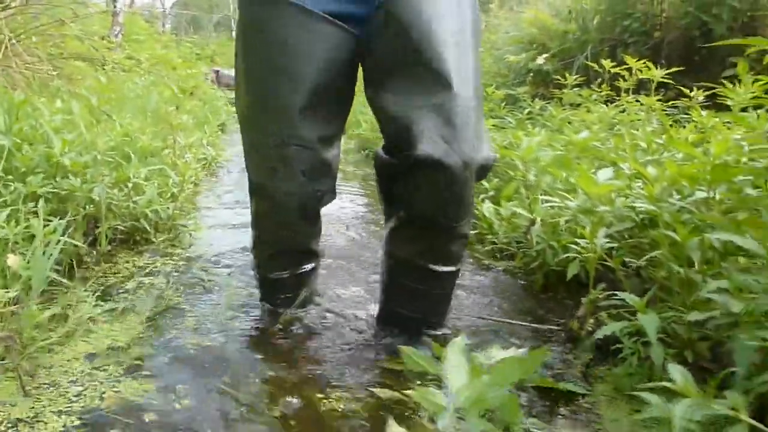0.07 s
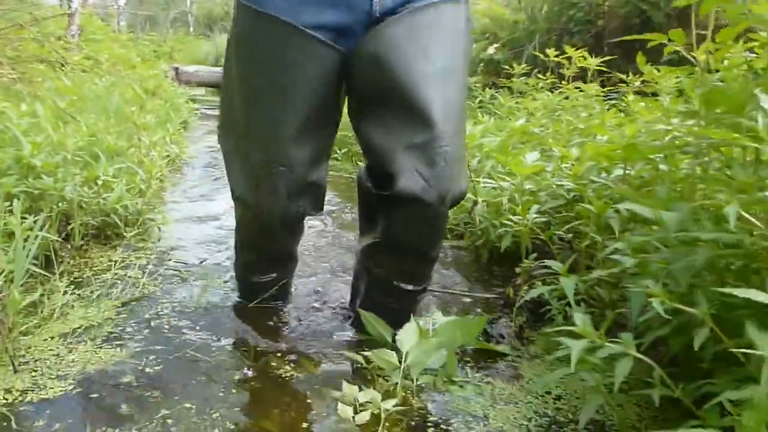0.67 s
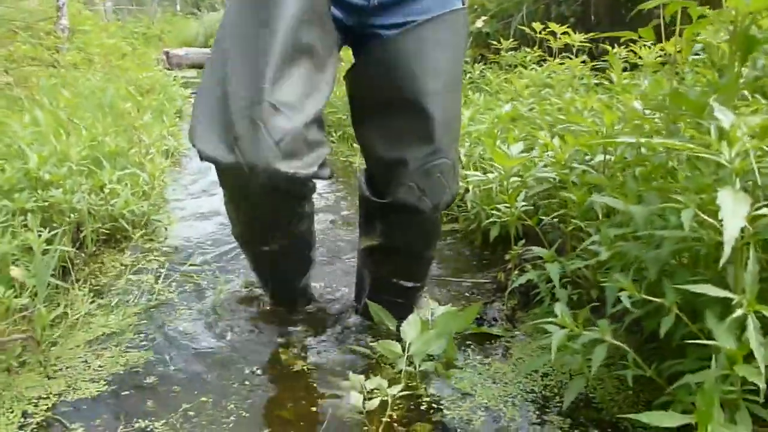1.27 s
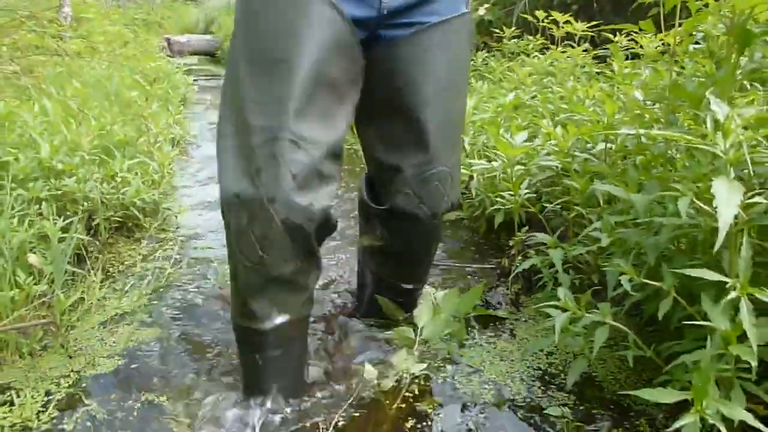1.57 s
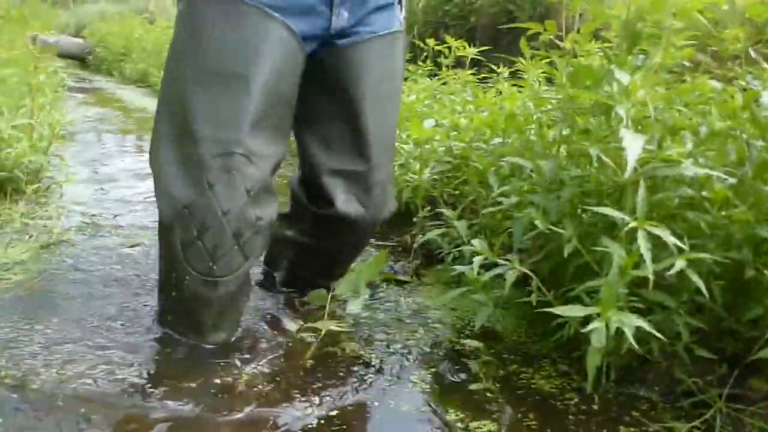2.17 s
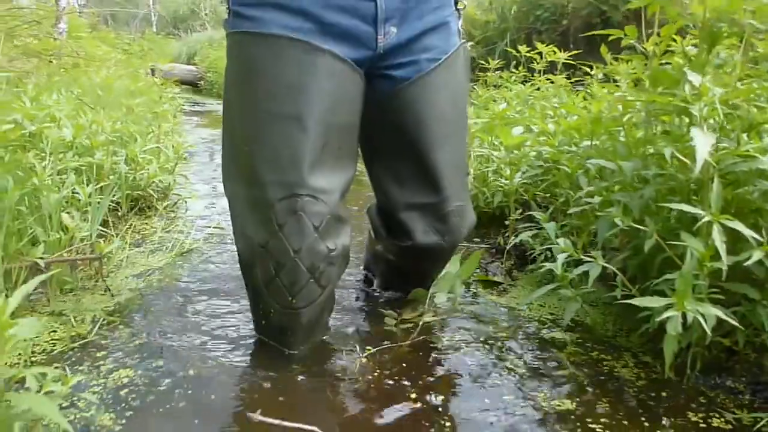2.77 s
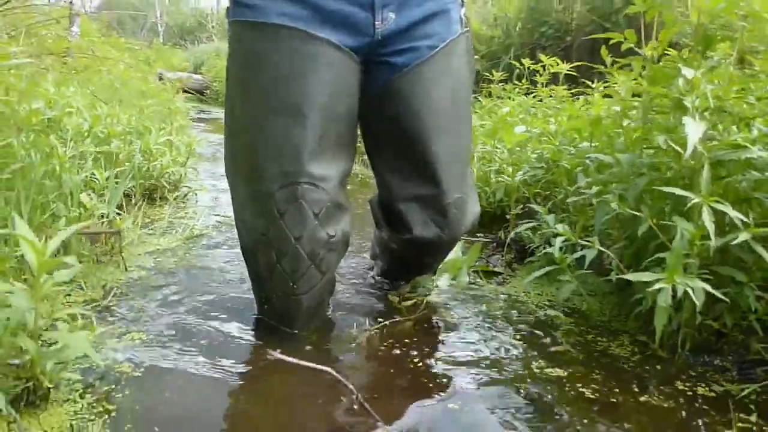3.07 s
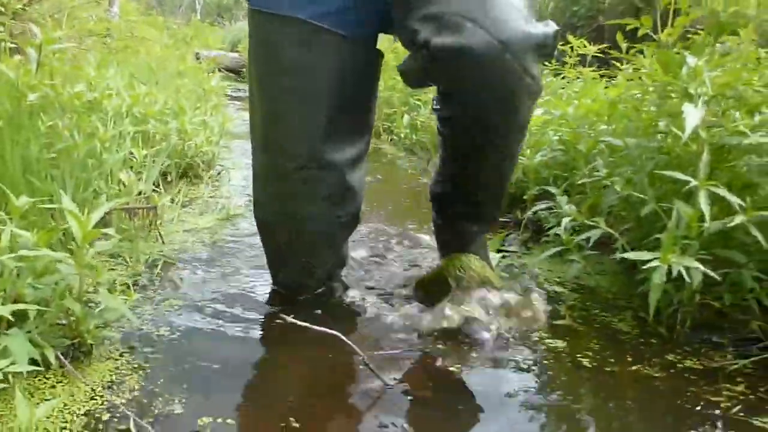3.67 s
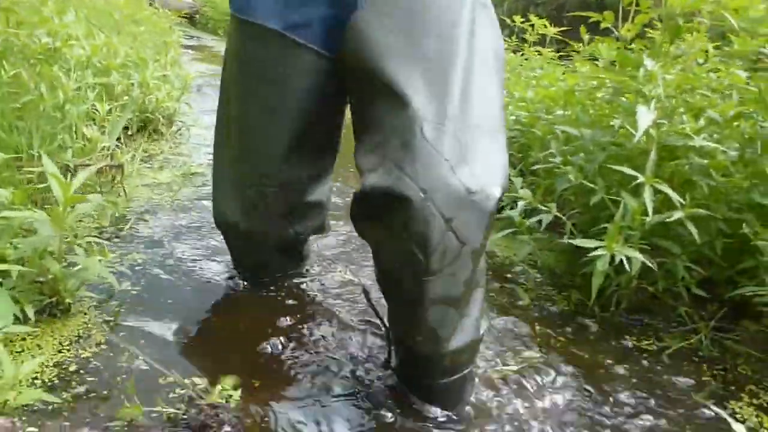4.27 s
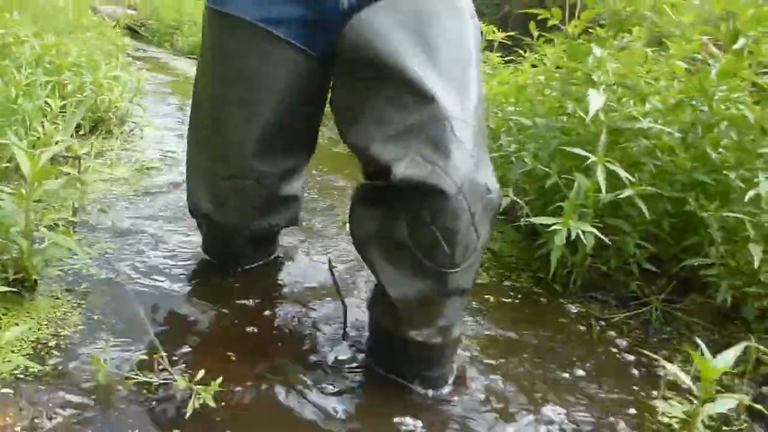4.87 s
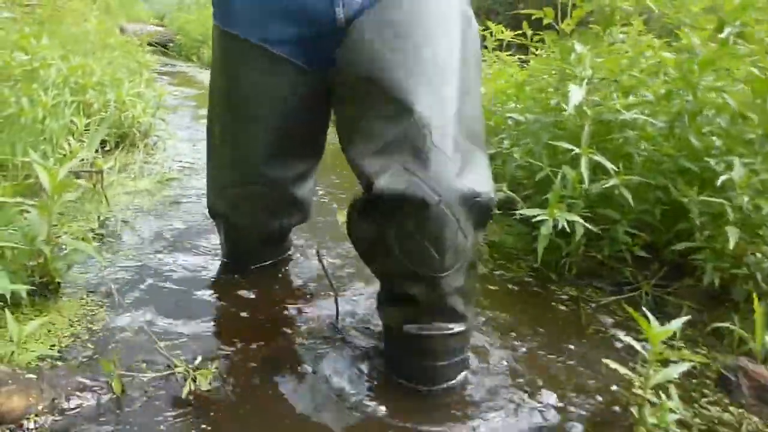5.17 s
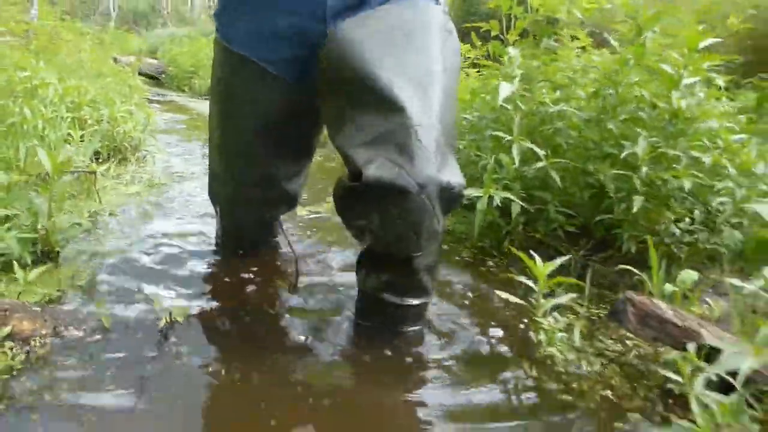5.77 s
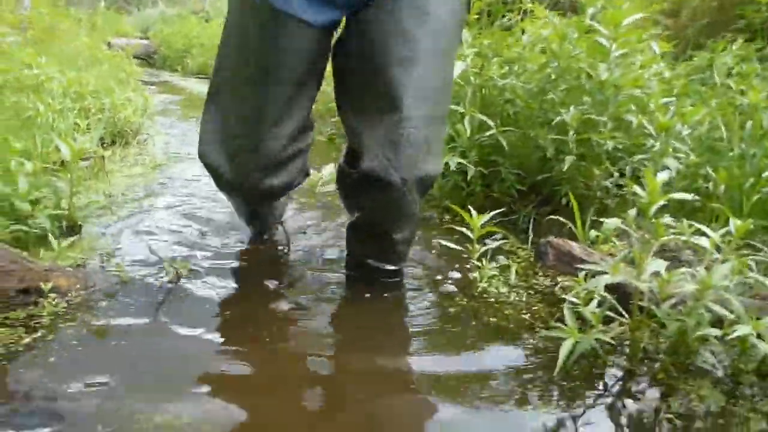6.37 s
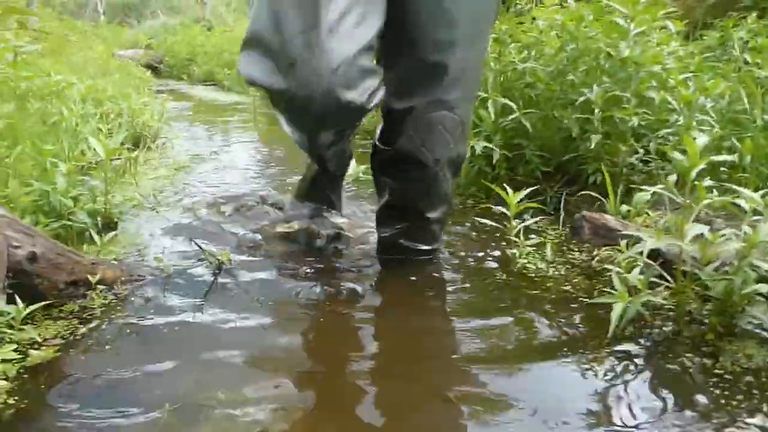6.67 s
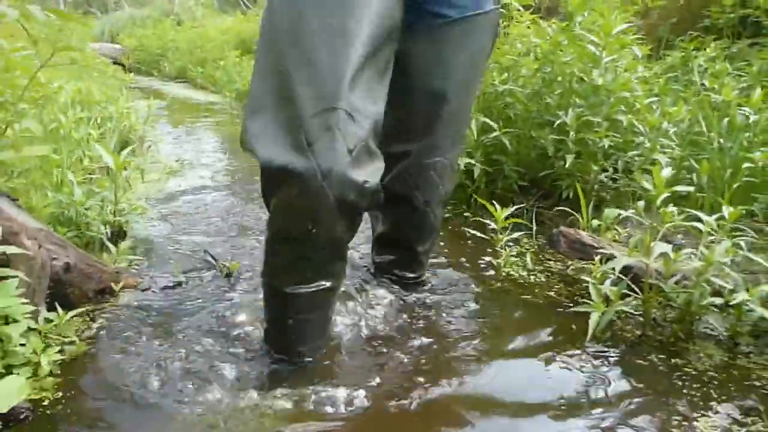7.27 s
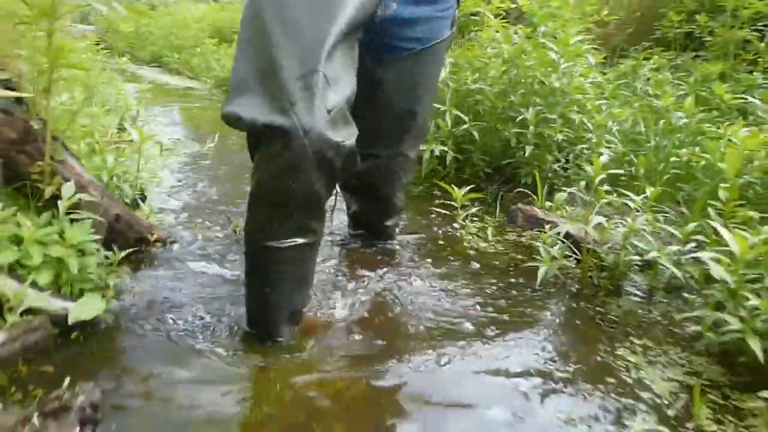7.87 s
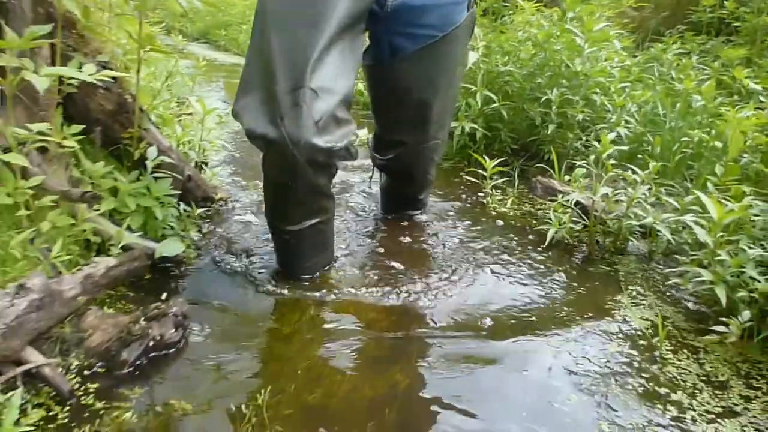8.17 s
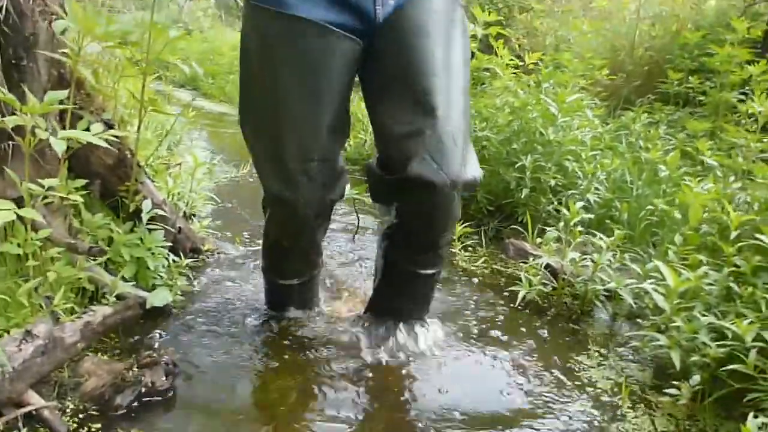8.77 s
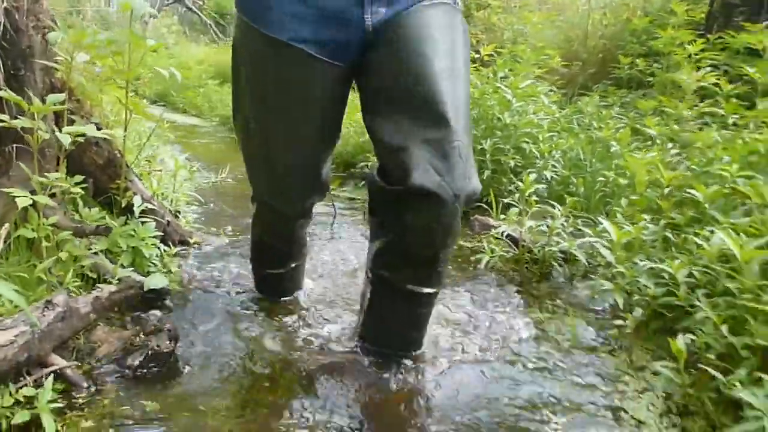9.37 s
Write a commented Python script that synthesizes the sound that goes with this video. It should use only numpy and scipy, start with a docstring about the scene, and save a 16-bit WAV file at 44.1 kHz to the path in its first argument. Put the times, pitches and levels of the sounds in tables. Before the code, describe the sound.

Faint stream ripples and an even hiss run underneath as water laps against rubber waders a few metres away. Two slow, splashing steps follow, then a lull of light drips, then two more steps, the first of them the heaviest. Each leg drags through the shallow water with a bubbly slosh, sharp droplets and often a dull knock of the boot. The sound stays near the centre, outdoors with very little echo.

```python
"""Faint ripples of a shallow stream run throughout, over a steady low murmur and wide microphone hiss.
From the start the water laps at someone in rubber waders, a few metres away: drops ping, single bubbles
ring and glide, the water slaps shut, and soon the rubber thuds dully. Four slow steps follow, at 1.2,
3.35, 6.45 and 8.66 s. Each leg drags a cloud of air bubbles through the water: big ones gulp, middling
ones slosh, tiny ones spray. After each boot lands, its wake fades and the waders drip."""
import sys
import numpy as np
from scipy import signal
from scipy.fft import rfft, irfft, next_fast_len
from scipy.io import wavfile
from scipy.ndimage import map_coordinates

SR = 44100
rng = np.random.default_rng(int(sys.argv[2]) if len(sys.argv) > 2 else 0)


def materialize(psi):
    """Save the field psi as 16-bit PCM at rate SR to the path in sys.argv[1].

    A 1-D psi becomes a single channel; in a 2-D psi each row is a channel.
    """
    bounded = np.clip(np.atleast_2d(psi).T, -1, 1)
    quanta = np.round(bounded * 32767).astype(np.int16)
    wavfile.write(sys.argv[1], SR, quanta)


N = 420273


def amp(db):
    """Decibels to gain."""
    return 10 ** (np.asarray(db) / 20)


def unit(x):
    """Scale to rms 1."""
    return x / np.sqrt(np.mean(x ** 2) + 1e-20)


def along(points, hz):
    """Read (frequency [Hz], value) points on a log axis."""
    knots_hz, values = np.transpose(points)
    return np.interp(np.log(hz + 1), np.log(knots_hz + 1), values)


def wobble(rate_hz):
    """Smooth random curve with knots at rate_hz."""
    knots = rng.standard_normal(int(N * rate_hz / SR) + 4)
    return map_coordinates(knots, [np.arange(N) * rate_hz / SR])


def filtered(x, response):
    """Apply a frequency response."""
    size = next_fast_len(N + SR // 2)
    return irfft(rfft(x, size) * response(np.fft.rfftfreq(size, 1 / SR)), size)[..., :N]


def add(track, start_s, sound, pan_db=0):
    """Mix a mono sound into a stereo track."""
    part = track[:, round(start_s * SR):][:, :len(sound)]
    part += amp([[pan_db / 2], [-pan_db / 2]]) * sound[:part.shape[1]]


def rush(spectrum, correlation):
    """Coloured stereo noise of rms 1."""
    def response(hz):
        angle = np.arccos(np.clip(along(correlation, hz), -1, 1)) / 2
        return amp(along(spectrum, hz)) * [np.cos(angle), np.sin(angle)]
    mid, side = filtered(rng.standard_normal((2, N)), response)
    return unit(np.array([mid + side, mid - side]))


def ring(t, hz, t60_s, rise, onset):
    """Damped sine; rise > 0 climbs like a bubble nearing the surface. Onset is a share of t60_s."""
    age = t / t60_s
    envelope = amp(-60 * age) * (1 - np.exp(-age / onset))
    lead_s = rise * t60_s * (np.hypot(1, 1.5 * age) - 1) / 2
    return envelope / envelope.max(axis=-1, keepdims=True) * np.sin(2 * np.pi * hz * (t + lead_s))


def cloud(gain, count, band_hz, cycles, rise, spread_db, onset, pan_db):
    """Random bubbles of one size class: harder stirring makes them denser and stronger."""
    low_hz, high_hz = band_hz
    density = np.sqrt(gain)
    jitter, pitch, climb = rng.random((count, 3)).T
    strength, life, side = rng.standard_normal((count, 3)).T
    quantile = (np.arange(count) + jitter) / count
    start = np.minimum(np.searchsorted(np.cumsum(density) / density.sum(), quantile), N - 1)
    hz = low_hz * (high_hz / low_hz) ** pitch
    t60_s = cycles / hz * np.exp(np.clip(life, -2, 2) / 2)  # small bubbles die sooner
    t = np.arange(int(min(t60_s.max(), .09) * SR)) / SR
    peak = amp(spread_db * np.minimum(strength, 1.5)) * gain[start] / np.sqrt(density[start] * t60_s)
    grains = peak[:, None] * ring(t, hz[:, None], t60_s[:, None], 2 * rise * climb[:, None], onset)
    samples = (start[:, None] + np.arange(len(t))).ravel()
    panned = [grains * amp(ear * pan_db * side / 2)[:, None] for ear in (1, -1)]
    stereo = np.array([np.bincount(samples, channel.ravel(), N)[:N] for channel in panned])
    return unit(stereo) * np.sqrt(np.mean(gain ** 2))


# Steady background, low murmur and microphone hiss: (frequency [Hz], relative density [dB])
BACKGROUND_SPECTRUM = [(18, -81), (30, -53.5), (85, -31.5), (226, -11.5), (381, -8.5), (472, -4.5),
                       (674, -7), (855, -7), (1080, -8.5), (1870, -13.5), (2110, -13), (2940, -14.5),
                       (6750, -20), (8770, -33.5), (11400, -73), (19300, -120)]
# Stereo width of that hiss: (frequency [Hz], left-right correlation [-1..1])
HISS_CORRELATION = [(60, 0.88), (110, 0.24), (210, 0.65), (380, 0.14), (710, -0.17), (1310, -0.7),
                    (2420, -0.6), (4490, 0.018), (8320, 1)]


def background():
    """A low murmur with wide, even microphone hiss, plus the stream's faint ripples."""
    drift = amp(0.41 * wobble(1.5) + 0.292 * wobble(9))
    noise_floor = amp(-51.5) * drift * rush(BACKGROUND_SPECTRUM, HISS_CORRELATION)
    ripples = cloud(amp(-61) * drift, count=900, band_hz=(346.3, 846), cycles=21,
                    rise=.13, spread_db=6.5, onset=.16, pan_db=12)
    return noise_floor + ripples


def burst(start_s, hold_s, t60_s, attack_s=.04):
    """Gain of a motion that breaks the surface, holds and dies away."""
    age_s = np.arange(N) / SR - start_s
    return np.clip(1 + age_s / attack_s, 0, 1) * amp(-60 * np.maximum(age_s - hold_s, 0) / t60_s)


# A leg shifts or a wave laps it: (time [s], length [s], slosh [dB], spray [dB])
LEG_SWISHES = [(0.031, .03, -50, -52), (0.14, .08, -59, -58), (0.733, .05, -58, -67),
               (0.919, .11, -54, -55), (2.058, .12, -55, -58), (3.349, .03, -46, -48), (4.2, .04, -48, -45),
               (6.279, .12, -58, -60.5), (7.27, .06, -47, -46), (7.766, .08, -58, -54),
               (8.022, .12, -59, -55), (8.445, .03, -60, -52), (9.36, .1, -53, -47)]
# Steps: (time [s], swing [s], sink [s], settling t60 [s], level [dB], swing swell [dB],
# sink fall [dB], spray over slosh [dB], drip level [dB])
LEG_STEPS = [(1.2, .23, .21, .8, -36.5, 7, 5, -1.69, -57), (3.35, .45, .24, .17, -37, 11, 5, 2, -58),
             (6.45, .37, .36, 1.1, -31.5, 13, 6.5, -.5, -46), (8.66, .27, .22, 1.1, -36, 6, 7, 0, -49.5)]
# Air escaping from under a boot: (time [s], length [s], level [dB])
BOOT_GLUGS = [(1.437, .02, -46), (3.988, .02, -48), (6.8, .07, -44), (7.149, .02, -47), (8.744, .2, -46),
              (9.078, .07, -50.5)]
LAPPING_DB, WAKE_DB = [-72.5, -67, -69], [-68, -57, -56]  # gulp, slosh, spray
STEP_GULP_DB, SWISH_GULP_DB = -20, -15  # relative to slosh


def leg_motion():
    """Stirring as gulp, slosh and spray gains: a step swells, eases as it sinks and leaves a wake."""
    t = np.arange(N) / SR
    power = np.zeros((3, N)) + amp(LAPPING_DB)[:, None] ** 2
    for start_s, length_s, slosh_db, spray_db in LEG_SWISHES:
        gains = amp([[slosh_db + SWISH_GULP_DB], [slosh_db], [spray_db]])
        power += (gains * burst(start_s, length_s, t60_s=.35)) ** 2
    for start_s, swing_s, sink_s, settle_s, db, swell_db, fall_db, spray_db, _ in LEG_STEPS:
        swing_db = np.interp(t - start_s, [0, swing_s], [-swell_db, 0])
        swing_db = swing_db * np.array([[1], [1], [1.25]])  # spray grows fastest as the leg speeds up
        sink_db = np.interp(t - start_s - swing_s, [0, sink_s], [0, -fall_db])
        gains = amp([[STEP_GULP_DB], [0], [spray_db]]) * amp(db + swing_db + sink_db)
        power += (gains * burst(start_s, swing_s + sink_s, settle_s)) ** 2
        power += (amp(WAKE_DB)[:, None] * burst(start_s, swing_s + sink_s, t60_s=5)) ** 2
    for start_s, length_s, db in BOOT_GLUGS:
        power[0] += (amp(db) * burst(start_s, length_s, t60_s=.37)) ** 2
    return np.sqrt(power)


# Churned water: (frequency [Hz], left-right correlation [-1..1])
WASH_CORRELATION = [(300, 1), (700, 1), (1600, 0.94), (4500, 1), (8000, 0.99)]


def churn(gain, froth, spectrum, flutter_db, flutter_hz):
    """Wash of countless weak bubbles: smooth when gentle, fluttering when frothy."""
    depth_db = flutter_db * froth
    flutter = amp(depth_db * wobble(flutter_hz) - depth_db ** 2 * np.log(10) / 20)  # keeps mean power
    return gain * flutter * rush(spectrum, WASH_CORRELATION)


# Wash under each bubble size: (frequency [Hz], relative density [dB])
GULP_SPECTRUM = [(50, -29), (120, -29), (180, -10.5), (250, 0.5), (400, 8.5), (600, -12), (1500, -66)]
SLOSH_SPECTRUM = [(150, -48.5), (350, -16.5), (520, -5.5), (900, -5.5), (1300, -12), (2200, -18.5),
                  (5000, -59)]
SPRAY_SPECTRUM = [(600, -40), (1200, -6.5), (1800, -2), (3000, 0.5), (4500, -18.5), (9000, -51.5)]
FIZZ_SPECTRUM = [(1000, -50), (2500, -14.5), (3700, 0), (4500, 3), (7000, -5.5), (9000, -8)]


def wading():
    """Each leg ploughs air under: four bubble sizes over a softer wash, in surges."""
    surge_db = 1.2 * wobble(40) + .8 * np.array([wobble(14) for _ in range(3)])
    stirring = leg_motion() * amp(surge_db)
    froth = stirring / np.hypot(stirring, amp([[-56], [-52], [-48]]))  # gentle motion traps little air
    gulp, slosh, spray = stirring * froth
    gulps = amp(4.5) * cloud(gulp, count=170, band_hz=(304.4, 502), cycles=19,
                             rise=.45, spread_db=7.5, onset=.087, pan_db=.5)
    sloshes = amp(-4) * cloud(slosh, count=700, band_hz=(531, 1292), cycles=33,
                              rise=.3, spread_db=3.5, onset=.035, pan_db=-1)
    plinks = amp(-5.5) * cloud(spray, count=2000, band_hz=(1238, 3594), cycles=45.5,
                               rise=.15, spread_db=6.5, onset=.13, pan_db=1)
    ticks = amp(-8.5) * cloud(spray, count=5200, band_hz=(3443, 7280), cycles=34,
                              rise=.1, spread_db=8.5, onset=.23, pan_db=8)
    low_swish, mid_swish, high_swish = stirring * (2 - froth)
    wash = amp(-4) * churn(low_swish, froth[0], GULP_SPECTRUM, flutter_db=5.5, flutter_hz=45)
    wash += amp(-4) * churn(mid_swish, froth[1], SLOSH_SPECTRUM, flutter_db=3.5, flutter_hz=70)
    wash += amp(-9.5) * churn(high_swish, froth[2], SPRAY_SPECTRUM, flutter_db=7.5, flutter_hz=120)
    wash += amp(-6) * churn(high_swish, froth[2], FIZZ_SPECTRUM, flutter_db=8, flutter_hz=160)
    return gulps + sloshes + plinks + ticks + wash


# Heavy drops hitting the surface: (time [s], level [dB], pitch [Hz], left over right [dB])
HEAVY_DROPS = [(0.044, -21.5, 5530, 3), (.196, -28, 5960, 0), (1.164, -21.5, 3270, -4),
               (1.525, -16.5, 3300, 4), (1.584, -22, 2700, 0), (1.785, -21, 4600, 3),
               (1.847, -17, 5760, 12.5), (1.855, -26, 5600, 3), (1.8586, -17.5, 5430, 8),
               (2.801, -38, 1490, 3), (3.0047, -31.5, 6000, -1), (3.58, -16.5, 5170, 2),
               (3.545, -32, 1740, -3), (3.624, -17, 2320, 1), (3.655, -19.5, 3480, 0), (3.69, -22, 3750, 3),
               (3.712, -22.5, 2180, 2), (3.807, -15.5, 3300, 0.5), (3.649, -17, 3700, -1),
               (3.9387, -18.5, 4400, 5), (3.994, -15.5, 5240, 4), (4.119, -17, 5340, 3.5),
               (4.178, -21.5, 5850, -1.5), (4.1859, -18, 5150, 3), (4.289, -26, 5250, 3),
               (4.331, -27.5, 4220, 6), (4.7395, -36, 2920, 2), (4.8302, -21, 4270, 12),
               (5.0835, -15, 4250, 11), (5.1097, -23, 2780, 8), (6.4244, -28.5, 4750, -4),
               (6.523, -26, 3860, -1), (6.562, -21, 3470, 0), (6.5876, -13, 4820, 0.5),
               (6.843, -23, 2580, -5), (6.9, -21.5, 4700, 2), (7.194, -19.5, 2820, -3),
               (6.7466, -13.5, 4280, -2), (6.989, -15.5, 3440, 0), (7.071, -17, 2900, -4),
               (7.2578, -10, 6680, -1.5), (7.484, -29.5, 2480, -1), (7.825, -25.5, 6000, -2),
               (7.92, -26, 4430, -1), (8.015, -28.5, 2040, -1), (8.449, -28.5, 4223, 2),
               (8.803, -24, 4200, 1), (8.967, -22.5, 2360, -3), (9.138, -26.5, 1700, 0),
               (9.223, -26, 1530, 4), (9.4407, -24.5, 5340, 3)]
DROP_T60_CYCLES = 12.5


def drops():
    """A drop cracks the surface and traps a tiny bubble; the boot echoes it and fine spatter follows."""
    out, t = np.zeros((2, N)), np.arange(SR // 16) / SR
    for start_s, db, hz, pan_db in HEAVY_DROPS:
        bubble = ring(t, hz, DROP_T60_CYCLES / hz, rise=.16, onset=.03)
        crack = amp(-10) * ring(t, hz * .73, t60_s=.00072, rise=0, onset=.025)
        ping = bubble + crack
        delay_s = rng.uniform(.0013, .0028)
        echo = np.pad(ping, (int(SR * delay_s), 0))[:len(t)]
        spatter = amp(-17 - 60 * t / .044) * rng.standard_normal(len(t))
        add(out, start_s + .000985, amp(db - 2.5) * (ping + amp(-8) * echo), pan_db)
        add(out, start_s + .000942, amp(db) * spatter, pan_db=rng.normal(0, 2.2))
    return out


def roughness(position, knot_count):
    """Two smooth random curves, for level and pitch; position is in knots."""
    pair = rng.standard_normal((2, knot_count))
    return [map_coordinates(knots, [position], mode="mirror") for knots in pair]


# Single large bubbles: (time [s], level [dB], pitch [Hz], t60 [s], pitch rise [1])
LARGE_BUBBLES = [(.056, -31.5, 1560, 0.02, 0.5), (0.184, -44, 1840, 0.042, -0.4),
                 (.338, -36.5, 2670, 0.02, 0.8), (.765, -46, 824, 0.09, 1), (.768, -46.5, 440, .07, 0),
                 (.822, -49, 1105, 0.061, -0.5), (.931, -43, 720, .04, 0), (1.165, -29.5, 355, 0.073, 1),
                 (1.216, -36, 1480, .025, 1.8), (1.243, -37, 407, 0.055, -1),
                 (1.477, -29.5, 1070, 0.052, 2.5), (1.534, -20, 2910, 0.028, 0),
                 (1.599, -32, 990, 0.014, -2), (1.698, -22.5, 940, 0.019, 0.6),
                 (1.965, -46, 1680, .04, 0.5), (2.068, -44.5, 895, 0.07, -0.5), (2.123, -45, 2800, .018, 0),
                 (2.17, -45, 535, .06, 1), (3.424, -26, 828, 0.062, 0), (3.626, -27, 2420, .03, 0),
                 (3.692, -27, 635, 0.047, 1), (3.76, -29, 1044, .03, -0.5), (3.826, -26, 590, 0.022, 0),
                 (3.898, -24.5, 1087, 0.04, 0.9), (3.945, -36.5, 624, 0.12, -0.5),
                 (3.9655, -19, 918, 0.039, 1), (3.979, -23.5, 767, 0.04, 0.5), (4.002, -33, 335, 0.054, 3),
                 (4.031, -27.5, 940, 0.043, -0.6), (4.215, -37, 912, 0.16, -0.5),
                 (4.213, -38, 1303, 0.12, 0.5), (4.242, -30, 3120, 0.022, 0), (4.275, -42, 1040, 0.054, 0),
                 (4.303, -40, 2510, .02, 0), (6.234, -49, 2700, 0.027, 0), (6.274, -40, 1930, 0.044, 0.3),
                 (6.424, -34, 469, 0.088, 1.3), (6.655, -31, 766, 0.038, 0), (6.851, -23.5, 680, 0.04, 0.5),
                 (6.932, -24, 858, 0.03, 0.5), (6.864, -18, 963, 0.059, 0.8),
                 (6.865, -19.5, 1925, 0.022, -0.5), (7.147, -31.5, 437, 0.069, -0.5),
                 (7.155, -26, 698, 0.086, 0), (7.218, -27, 1960, 0.018, 1.3), (7.41, -42, 960, 0.067, 0.9),
                 (7.642, -33, 915, 0.053, 1.2), (7.737, -42.5, 798, 0.061, 0),
                 (7.762, -38.5, 594, 0.044, 0), (7.771, -36.5, 1800, 0.046, 1.6),
                 (7.806, -37, 2770, 0.016, 2), (7.828, -40, 2080, 0.017, 0.5),
                 (7.877, -44.5, 456, .16, -0.5), (7.974, -47, 746, 0.088, 0.2),
                 (8.016, -40, 1427, 0.05, 0.3), (8.07, -42, 2020, 0.017, 2), (8.098, -37.5, 710, 0.031, 0),
                 (8.123, -41, 1360, 0.023, 0.5), (8.241, -45, 2330, .025, 0), (8.134, -36.5, 714, 0.089, 1),
                 (8.168, -34, 845, 0.042, 2.1), (8.449, -29, 4320, 0.0097, 0),
                 (8.472, -33.5, 2360, 0.031, 0), (8.5405, -27.5, 4100, 0.0079, 0.3),
                 (8.573, -42, 544, 0.034, 0.5), (8.726, -32, 380, 0.13, 0.5), (8.787, -29.5, 610, 0.035, 3),
                 (8.844, -29.5, 399, 0.26, -0.5), (8.925, -32, 383, 0.19, 1.9), (9.075, -34, 406, 0.14, 1),
                 (9.1, -26.5, 1530, 0.02, 1.7), (9.141, -35.5, 336, 0.21, 2.5)]


def bubbles():
    """Air pockets pinch off with a spit and ring; their wobbling shape roughens level and pitch."""
    out, t = np.zeros((2, N)), np.arange(SR // 5) / SR
    for start_s, db, hz, t60_s, rise in LARGE_BUBBLES:
        tremor, sway = roughness(t * 300, knot_count=128)
        uneven_t = np.cumsum(1 + .04 * sway) / SR
        tone = amp(db + 2 * tremor) * ring(uneven_t, hz, t60_s, rise, onset=.016)
        spit = amp(db - 14 - 60 * t / .053) * rng.standard_normal(len(t))
        add(out, start_s, amp(2) * tone + spit)
        bank_echo_s = rng.uniform(.00424, .009)  # the echo beats with the gliding tone
        add(out, start_s + bank_echo_s, amp(-14) * tone, pan_db=rng.normal(0, 4.7))
    return out


# Singing air pockets: (time [s], length [s], level [dB], start pitch [Hz], end pitch [Hz])
SURFACE_POCKETS = [(0.074, 0.038, -38, 475, 1180), (0.077, 0.025, -44, 1000, 2020),
                   (0.332, 0.03, -48.5, 1550, 2520), (0.709, 0.052, -43, 512, 1240),
                   (1.099, 0.034, -46, 620, 1030), (1.182, 0.016, -27, 580, 790),
                   (1.291, 0.066, -32, 850, 1277), (1.35, .013, -26, 893, 1100),
                   (1.368, 0.025, -29.5, 426, 506), (1.414, 0.015, -20.5, 700, 910),
                   (1.551, 0.027, -36, 497, 596), (1.751, 0.029, -39, 432, 550),
                   (1.579, 0.035, -37, 672, 1090), (1.778, 0.025, -34, 856, 1060),
                   (1.803, 0.024, -36, 1052, 1280), (1.864, 0.027, -43, 1010, 2020),
                   (2.31, 0.033, -50, 720, 1250), (2.762, 0.039, -48, 503, 820),
                   (3.489, 0.05, -36, 890, 570), (6.279, 0.024, -45, 1550, 2030),
                   (6.451, 0.026, -41, 600, 1170), (6.714, 0.069, -29, 584, 396),
                   (6.783, 0.068, -29.5, 374, 726), (7.025, 0.03, -33, 835, 1470),
                   (7.272, 0.022, -41, 576, 900), (7.283, 0.026, -37.5, 1026, 1510),
                   (7.557, 0.025, -42.5, 910, 1400), (7.643, 0.025, -28, 879, 1660),
                   (8.022, 0.02, -48, 1820, 2700), (8.963, 0.046, -34.5, 503, 593),
                   (9.014, 0.028, -24, 517, 580)]


def glides():
    """A surface air pocket sings as it changes size, bends ever faster and cuts off as it opens."""
    out = np.zeros((2, N))
    for start_s, length_s, db, start_hz, end_hz in SURFACE_POCKETS:
        age = np.linspace(0, 1, round(length_s * SR))
        tremor, sway = roughness(age * length_s * 250, knot_count=32)
        hz = start_hz * (end_hz / start_hz) ** (age ** 1.32) * (1 + .02 * sway)
        envelope = np.sin(np.pi * age ** .54).clip(0) * amp(db + 1.5 * tremor)
        add(out, start_s, envelope * np.sin(2 * np.pi * np.cumsum(hz) / SR))
    return out


# Water slapping shut: (time [s], level [dB], cavity pitch [Hz], attack [s], t60 [s])
WATER_SLAPS = [(.196, -38.5, 1340, 0.0034, 0.017), (1.243, -34.5, 675, 0.0027, 0.065),
               (1.334, -34, 1650, 0.018, 0.063), (1.45, -31, 2600, 0.0034, 0.088),
               (1.527, -24, 2480, 0.0056, .03), (1.636, -34.5, 3800, 0.0074, .04),
               (1.699, -30.5, 1580, 0.0035, 0.13), (1.779, -36, 2000, 0.0037, 0.1),
               (1.809, -32.5, 1560, 0.0037, 0.078), (3.343, -38.5, 900, 0.0095, 0.11),
               (3.65, -28.5, 2920, 0.0054, .03), (3.693, -29, 900, .005, 0.043),
               (3.805, -29, 930, 0.0056, 0.025), (3.929, -30.5, 1590, .002, 0.022),
               (4.0205, -18, 1200, 0.00054, 0.011), (4.205, -33, 1460, 0.0018, .036),
               (5.083, -27.5, 645, 0.00092, 0.01), (6.846, -26, 1090, 0.0054, .05),
               (6.863, -24.5, 1380, .002, 0.077), (6.986, -24.5, 1000, 0.0018, 0.018),
               (7.088, -31, 1100, .002, 0.022), (7.317, -36.5, 3080, 0.0039, .04),
               (7.404, -39.5, 2220, 0.0041, 0.039), (8.721, -29.5, 1250, .005, 0.045),
               (8.921, -30.5, 1060, 0.0074, 0.1)]
SLAP_EDGE_RATIO = 1.98


def slaps():
    """A hollow closes behind a boot or against a leg and colours a burst of churned water."""
    out, t = np.zeros((2, N)), np.arange(SR // 8) / SR
    for start_s, db, hz, attack_s, t60_s in WATER_SLAPS:
        hollow = signal.butter(2, [hz / SLAP_EDGE_RATIO, hz * SLAP_EDGE_RATIO], "bandpass", fs=SR)
        churned = unit(signal.lfilter(*hollow, rng.standard_normal(len(t))))
        envelope = np.minimum(t / attack_s, 1) * amp(-60 * np.maximum(t - attack_s, 0) / t60_s)
        add(out, start_s, amp(db) * envelope * churned)
    return out


# Boot knocks: (time [s], level [dB])
BOOT_THUDS = [(.851, -34.5), (0.97, -37.5), (1.127, -42), (1.536, -31.5), (1.615, -39), (2.803, -42),
              (3.614, -34.5), (3.931, -36), (4.02, -31), (4.224, -41), (6.281, -41), (6.333, -40.5),
              (6.353, -38.5), (6.864, -26), (6.989, -22), (7.089, -28)]
# Rubber resonances: (frequency [Hz], level [dB], t60 [s])
RUBBER_MODES = [(265, -3, 0.026), (402, 3, 0.013), (642, -7, 0.026)]
BOOT_LOW_CUT_HZ = 190


def boots():
    """Rubber buckles or a sole meets the bed: a short, dull knock that radiates little deep bass."""
    out, t = np.zeros((2, N)), np.arange(SR // 10) / SR
    for start_s, db in BOOT_THUDS:
        knock = np.zeros(len(t))
        for hz, mode_db, t60_s in RUBBER_MODES:
            detune = np.exp(.12 * rng.standard_normal())
            knock += amp(mode_db) * ring(t, hz * detune, t60_s, rise=0, onset=.081)
        add(out, start_s, amp(db + 1.5) * knock)
    return signal.lfilter(*signal.butter(2, BOOT_LOW_CUT_HZ, "highpass", fs=SR), out)


def dripping():
    """After each step lands, the waders drain in light drips and deeper plops that thin out."""
    wetness = sum(amp(drip_db) * burst(start_s + swing_s + sink_s, hold_s=0, t60_s=5.4)
                  for start_s, swing_s, sink_s, *_, drip_db in LEG_STEPS)
    drips = cloud(wetness, count=420, band_hz=(1577, 5960), cycles=25,
                  rise=.15, spread_db=6, onset=.14, pan_db=1.5)
    plops = cloud(wetness, count=130, band_hz=(449, 1720), cycles=28,
                  rise=.2, spread_db=2.5, onset=.03, pan_db=5.5)
    return amp(-5) * drips + amp(-11) * plops


# Reverberation of the banks: (frequency [Hz], t60 [s])
BANK_DECAY = [(200, 0.12), (1500, 0.14), (8000, 0.083)]


def banks(x):
    """Leafy banks scatter a short, diffuse echo."""
    hz, t, noise = signal.stft(rng.standard_normal((2, SR // 4)), SR, nperseg=256)
    decay = amp(-60 * t / along(BANK_DECAY, hz)[:, None])
    _, tail = signal.istft(noise * decay, SR, nperseg=256)
    return signal.fftconvolve(x, tail / np.linalg.norm(tail[0]), axes=1)[:, :N]


# Walker's position: (time [s], left over right [dB])
WALKER_PATH = [(0.0, 7), (1.22, -1), (4.27, 2), (6.84, -1), (9.3, 0)]


def scene():
    """The steps between the banks, over the steady background."""
    pan_db = np.interp(np.arange(N) / SR, *np.transpose(WALKER_PATH))
    walker = (wading() + dripping() + slaps()) * amp(np.array([pan_db, -pan_db]) / 2)
    steps = walker + bubbles() + glides() + drops() + boots()
    steps = filtered(steps, lambda hz: (1j * hz / (1j * hz + 145)) ** 4)  # small sources: little bass
    return steps + amp(-12.5) * banks(steps) + background()


# Microphone response: (frequency [Hz], gain [dB])
MIC_RESPONSE = [(20, -3), (6500, 3), (7300, 0), (7700, -8), (8000, -25), (8450, -15.5), (8900, -26.5)]
MIC_TOP_HZ = 8920


def record(dry):
    """A small, narrow-band camera microphone."""
    return filtered(dry, lambda hz: amp(along(MIC_RESPONSE, hz)) * (hz < MIC_TOP_HZ))


dry = scene()
out = record(dry)
materialize(out)
```